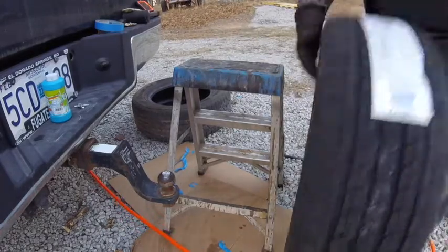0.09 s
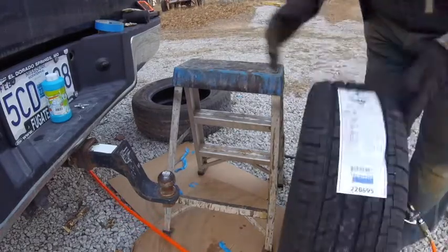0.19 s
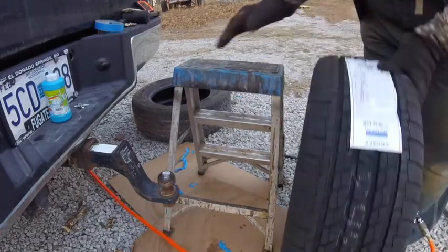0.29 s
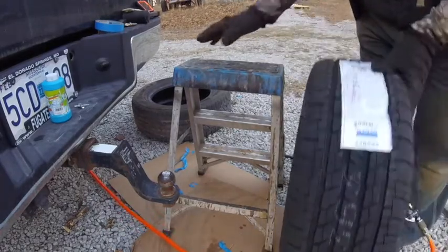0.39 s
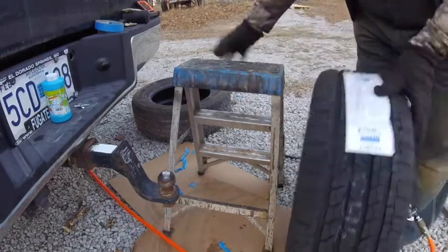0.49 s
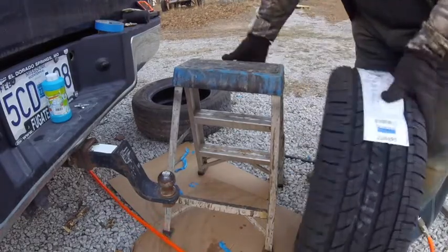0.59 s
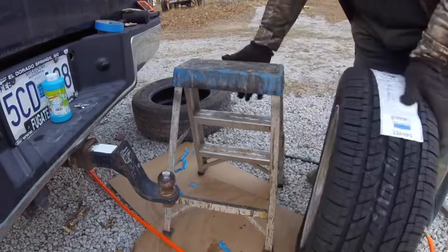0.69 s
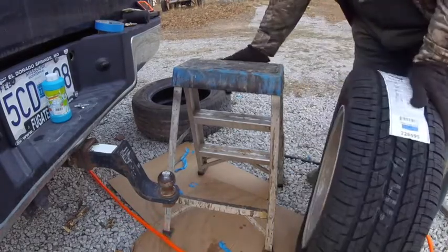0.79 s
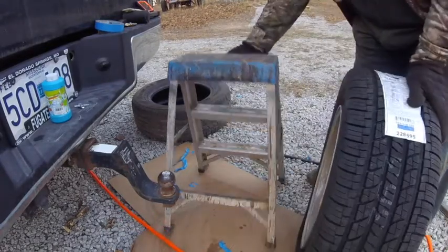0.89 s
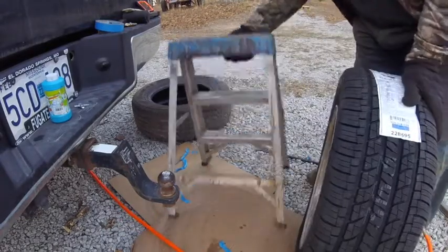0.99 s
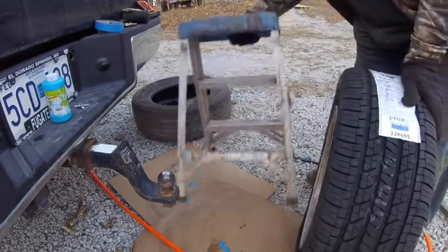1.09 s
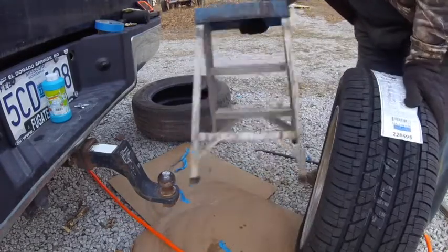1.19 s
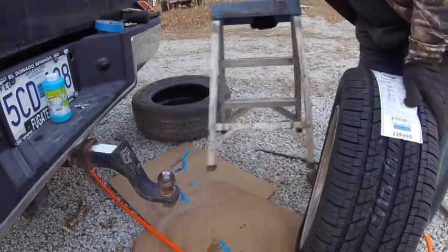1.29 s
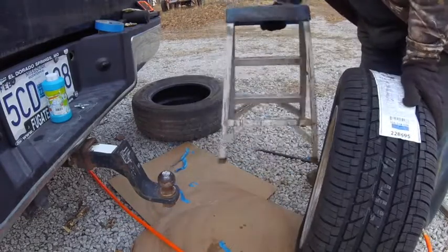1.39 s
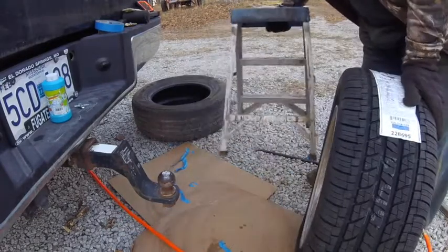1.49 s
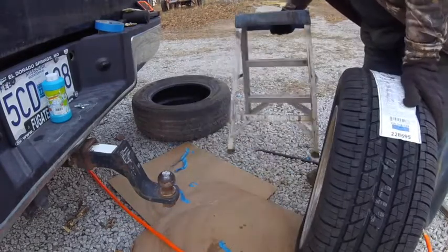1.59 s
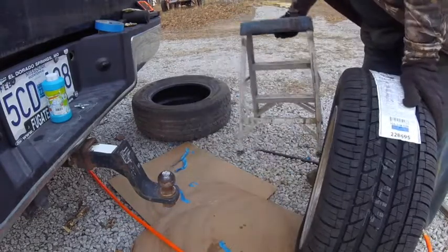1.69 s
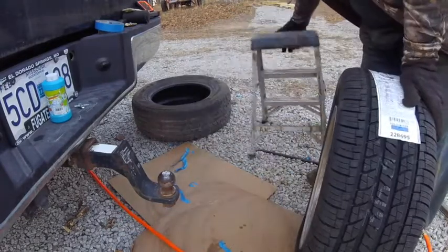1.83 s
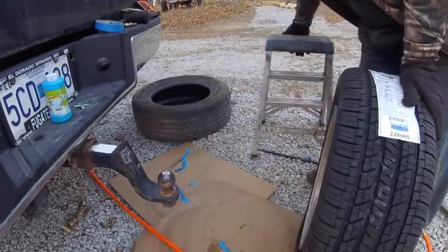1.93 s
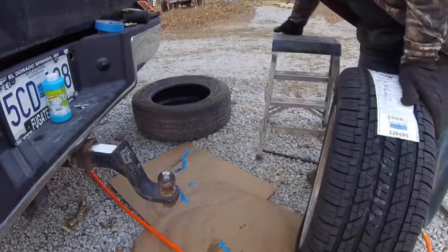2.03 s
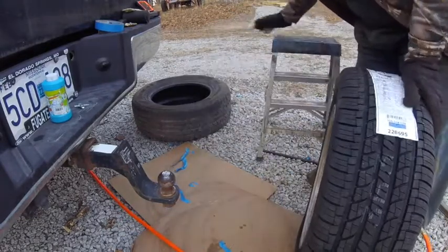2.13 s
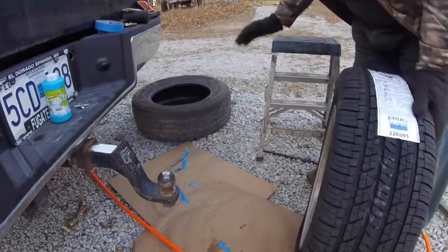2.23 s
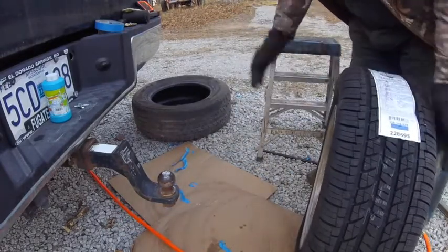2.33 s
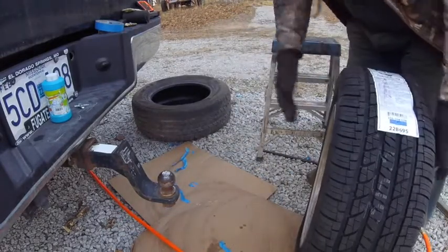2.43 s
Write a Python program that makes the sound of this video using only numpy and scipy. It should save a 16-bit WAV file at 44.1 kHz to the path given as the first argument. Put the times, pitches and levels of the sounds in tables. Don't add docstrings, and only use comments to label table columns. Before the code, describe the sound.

A rimmed tire drops on gravel with a hard slap and hollow boom, bounces again, then a light metal step stool is set down with ringing clanks and gritty scrapes; close microphone, quiet open yard.

```python
import sys
import numpy as np
from scipy import signal
from scipy.fft import rfft, irfft, next_fast_len
from scipy.io import wavfile
from scipy.ndimage import map_coordinates

SR = 44100
rng = np.random.default_rng(int(sys.argv[2]) if len(sys.argv) > 2 else 0)


def bounce(signal):
    frames = np.transpose(np.atleast_2d(signal))
    limited = np.clip(frames, -1, 1)
    pcm = np.round(limited * 32767).astype(np.int16)
    wavfile.write(sys.argv[1], SR, pcm)


def linear_from_db(decibels):
    return 10 ** (np.asarray(decibels, float) / 20)


N = 110250
T = np.arange(N) / SR
THUMP_RISE_S = 0.0036


def unit(x):
    return x / np.sqrt(np.mean(x ** 2) + 1e-20)


def along(points, hz):
    f, level_db = np.transpose(points)
    return linear_from_db(np.interp(np.log(hz + 1), np.log(f + 1), level_db))


def filtered(x, response):
    m = next_fast_len(N + 8192)
    return irfft(rfft(x, m) * response(np.fft.rfftfreq(m, 1 / SR)), m)[:N]


def colored(x, points):
    return unit(filtered(x, lambda f: along(points, f)))


def wobble(rate):
    knots = rng.standard_normal(int(N * rate / SR) + 4)
    return map_coordinates(knots, [T * rate])


def grains():
    clicks_per_s, spread_db = 5000, 3.5
    hit = rng.random(N) < clicks_per_s / SR
    size = linear_from_db(spread_db * rng.standard_normal(N))
    return unit(rng.standard_normal(N) * (0.51 + hit * size))


def burst(s, hold, db, release):
    rise_s = 0.002
    fall_db = 30 * np.clip(T - s - hold, 0, 1) / release
    return linear_from_db(db - fall_db) * np.clip((T - s) / rise_s, 0, 1)


def decay(s, db, t60):
    return linear_from_db(db - 60 * np.clip(T - s, 0, 1) / t60) * (T >= s)


def ring(s, db, modes, rise, scatter=1):
    t = np.clip(T - s, 0, 1)
    total = np.zeros(N)
    for hz, level, t60 in modes:
        mode_db = db + level + scatter * rng.normal(0, 1.5)
        phase = scatter * rng.normal(0, 0.35)
        total += linear_from_db(mode_db - 60 * t / t60) * np.sin(2 * np.pi * hz * t + phase)
    return -(1 - np.exp(-t / rise)) * total


# start_s, level_db
EDGE_BLOWS = [
    (.2048, -21),
    (.2090, -27),
]
# pitch_hz, level_db, t60_s
RIM = [(421.6, 3.5, 0.088), (472, 2.5, .05), (588, -9, 0.03), (790, -8.5, 0.034), (936, 9, 0.016),
       (1260, -10, 0.04), (1670, -9, 0.013), (1755, 4, 0.017), (1930, -10, 0.028), (2495, -5.5, 0.037),
       (2580, -15.5, 0.025)]
# pitch_hz, level_db, t60_s
SIDEWALL = [(103.7, -3.5, 0.2), (134, -0.5, 0.21), (178, 7, 0.046), (216, -4, 0.051)]


def first_landing():
    rim = sum(ring(s, db, RIM, 0.00053, scatter=0) for s, db in EDGE_BLOWS)
    squash = ring(0.2079, -21.5, SIDEWALL, 0.0021, scatter=0)
    return rim + squash


# start_s, thump_db, air_db, slap_db
LANDINGS = [(0.192, -39, -44.5, -53), (0.22, -36, -37, -20.5), (0.235, -26, -74, -52),
            (0.281, -50, -60, -30), (0.298, -24, -49.5, -33), (0.454, -29.5, -37, -33),
            (0.461, -38, -34.5, -30.5), (.483, -29.5, -36, -34.5), (0.492, -25.5, -59, -38.5),
            (0.562, -37.5, -74, -46.5), (0.611, -42, -48.5, -46), (.64, -40.5, -51.5, -46.5),
            (0.676, -47.5, -80, -75), (0.903, -40.5, -50, -47.5), (0.948, -37.5, -52, -79),
            (0.991, -47, -61.5, -79)]
# pitch_hz, level_db, t60_s
CARCASS = [(56.5, 0.5, 0.19), (98.2, 4, 0.08), (117.8, 2, 0.18), (140.5, 3, 0.077), (159, -8, 0.017)]
# pitch_hz, level_db, t60_s
CAVITY = [(216.8, 1, 0.26), (244, -6, 0.35)]
# pitch_hz, level_db, t60_s
TREAD = [(167, 3, 0.077), (415.5, -0.5, 0.075), (484, -2, 0.052), (793, -8, 0.054), (940, -2, 0.022),
         (1206, -16, 0.028), (1774, 2, 0.0094), (1910, -15, 0.027), (2450, -11.5, 0.029),
         (2637, -17, 0.043)]


def tire():
    out = first_landing()
    for s, thump_db, air_db, slap_db in LANDINGS:
        out += ring(s, thump_db - 7.5, CARCASS, THUMP_RISE_S)
        out += ring(s, air_db, CAVITY, THUMP_RISE_S)
        out += ring(s, slap_db - 6.0, TREAD, 0.00063)
    return out


# start_s, hold_s, level_db, release_s
CRUNCH = [(0.0, 0.013, -64.5, 0.076), (0.081, 0.055, -65, 0.05), (0.207, 0.015, -42, 0.02),
          (0.223, 0.014, -36.5, 0.011), (.279, 0.0024, -48, 0.015), (0.241, 0.054, -52, 0.078),
          (0.45, 0.0069, -49.5, 0.087), (0.467, 0.012, -57, 0.03), (0.512, 0.055, -62, 0.064),
          (0.599, 0.035, -63, 0.2), (0.854, 0.0061, -55, 0.055), (0.878, 0.011, -54.5, 0.09),
          (0.9106, 0.017, -45, 0.019), (0.938, 0.0082, -49, 0.028), (2.267, 0.068, -62.5, .04),
          (2.417, 0.036, -64, 0.046)]
# start_s, hold_s, level_db, release_s
IMPACT_SPRAY = (.2045, .005, -32, .008)
# freq_hz, level_db (per Hz)
STONES = [(180, -7), (300, -43), (382, -8), (826, -12.5), (1030, -14), (4190, -25.5), (5080, -16),
          (9220, -29), (14000, -82.5)]


def gravel():
    load = sum(burst(*row) for row in CRUNCH + [IMPACT_SPRAY])
    return load * colored(grains(), STONES)


# start_s, knock_db, thud_db (ground)
KNOCKS = [(1.402, -65, -41), (1.412, -26.5, -60), (1.846, -30, -64), (1.857, -25, -72), (1.864, -26, -72),
          (1.872, -24, -67), (1.876, -15.5, -63), (1.968, -19, -43), (1.973, -45, -73), (1.995, -34, -75),
          (2.004, -37.5, -50), (2.055, -44, -68), (2.068, -38.5, -54), (2.093, -40, -62),
          (2.099, -27.5, -49.5), (2.183, -58, -49.5)]


def foot_knocks():
    return sum(decay(s, db, 0.0062) for s, db, _ in KNOCKS) * rng.standard_normal(N)


# start_s, hold_s, level_db, release_s, bright_db
GRINDS = [(1.404, 0.0036, -43, 0.065, 1.5), (1.413, 0.026, -67, 0.026, -20),
          (1.8447, 0.011, -34.5, 0.0083, 11.5), (1.854, 0.014, -31.5, 0.053, 11.5),
          (1.87, 0.01, -28.5, 0.028, 6.5), (1.897, 0.078, -48, 0.064, 4.5), (1.958, 0.019, -45.5, 0.048, 6),
          (1.965, 0.0078, -32, 0.025, 1.5), (1.991, 0.023, -48.5, 0.11, 6.5),
          (2.001, 0.0019, -36, 0.015, -15), (2.047, 0.026, -49, 0.027, -12), (2.09, 0.018, -44, 0.065, 3.5),
          (2.145, 0.019, -53.5, 0.17, 2.5), (2.174, 0.017, -51, 0.015, -2)]
# pitch_hz, width_hz, level_db
BUMPED = [(150, 85, -7), (386, 28, 3), (755, 240, -8), (1090, 130, 0), (1400, 84, 0.5), (1820, 110, -5),
          (2190, 59, 0), (2680, 170, -10.5), (3400, 160, -13.5)]
# pitch_hz, width_hz, level_db
SET_DOWN = [(170, 150, -13.5), (412.5, 17.2, 7), (720, 63, -5.5), (894, 26, 2), (1150, 50, 2.5),
            (1270, 54, 4.5), (1373, 120, 2.5), (1780, 160, -8.5), (2210, 130, -1.5), (2830, 190, -4),
            (3180, 100, -17)]
# pitch_hz, width_hz, level_db
ROCKED = [(169, 150, -15.5), (404, 50, 2.5), (662, 110, -1.5), (923, 50, 3.5), (1131, 53, 4.5),
          (1310, 150, 2), (1614, 120, 0), (1856, 140, 0), (2270, 190, -1.5), (3320, 230, -8.5)]
# pitch_hz, width_hz, level_db
SETTLING = [(169, 88, -6.5), (402, 59, 1.5), (765, 110, -0.5), (1125, 42, 6), (1430, 300, -4),
            (1920, 92, 0), (2120, 210, -5.5), (2830, 250, -9.5), (3650, 110, -7.5)]


def body(modes):
    def response(f):
        total = linear_from_db(-41) * 1j * f / (300 + 1j * f)
        for k, (hz, width, db) in enumerate(modes):
            peak = 1j * f * width / (hz * hz - f * f + 1j * f * width)
            total = total + (-1) ** k * linear_from_db(db) * peak
        return total / (1 + 1j * f / 4100) ** 2
    return response


def stool_frame(knocks):
    rub = grains()
    shake = rub * sum(burst(*row[:4]) for row in GRINDS) + knocks
    stances = [(0, 1.6, BUMPED), (1.6, 1.94, SET_DOWN), (1.94, 2.035, ROCKED), (2.035, 2.5, SETTLING)]
    frame = np.zeros(N)
    for start_s, end_s, modes in stances:
        frame += filtered(shake * (T >= start_s) * (T < end_s), body(modes))
    return frame / np.std(filtered(rub, body(SET_DOWN)))


# freq_hz, level_db (per Hz)
GRIT = [(1000, -14.5), (3000, -2.5), (4200, -5.5), (5400, 2), (6500, -3.5), (8500, -13.5), (11000, -17.5),
        (14500, -62)]


def grit(knocks):
    spray = 0.09 * np.abs(knocks)
    for s, hold, db, release, bright_db in GRINDS:
        spray = spray + burst(s, hold, db + bright_db - 7, 0.52 * release)
    return spray * colored(grains(), GRIT)


# start_s, hold_s, level_db, release_s
FIZZ = [
    (.2045, .004, -60, .01),
    (1.845, .017, -50, .012),
    (1.874, .004, -65, .008),
    (1.974, .004, -66, .01),
    (2.092, .01, -74, .02),
]
# freq_hz, level_db (per Hz)
DUST = [(6000, -46), (8500, 6), (12000, -24), (14500, 1)]


def dust():
    return colored(grains(), DUST) * sum(burst(*row) for row in FIZZ)


# pitch_hz, level_db, t60_s
GROUND = [(72, -6, 0.15), (124, 7, 0.058), (177, -3, 0.16)]


def ground_thuds():
    return sum(ring(s, thud_db, GROUND, THUMP_RISE_S) for s, _, thud_db in KNOCKS)


def stool():
    knocks = foot_knocks()
    return stool_frame(knocks) + grit(knocks) + dust() + ground_thuds()


# start_s, peak_db, center_hz, width (over center)
TICKS = [(0.28, -18, 1050, 0.92), (0.388, -40, 1170, 1.3), (0.457, -23.5, 1820, 1.1), (.56, -55, 1100, .6),
         (.606, -40, 1490, 0.9), (.63, -46, 603, 1.6), (0.66, -27, 5670, 0.16), (.768, -26, 2080, 1.36),
         (.769, -27.5, 4960, 0.47), (0.782, -34, 400, 1.4), (0.8662, -31, 1850, 3.7),
         (0.8812, -26.5, 3400, 17), (0.914, -29, 6000, 0.7), (.919, -23, 6000, 1.4),
         (0.9234, -18, 5640, 0.35), (0.9256, -13.5, 5940, 0.45), (.946, -25, 5200, 0.31),
         (1.9690, -6, 2160, 0.53), (1.9715, -4.5, 1420, 0.29), (1.879, -15, 2210, .15),
         (2.183, -19.5, 2830, 0.071), (2.122, -43, 406, 0.31), (2.093, -16.5, 5930, 0.36),
         (2.147, -29.5, 6100, 0.59), (2.447, -38, 4040, 1.2)]


def ticks():
    out = np.zeros(N)
    for s, db, hz, width in TICKS:
        crack = 0.5 * rng.standard_normal(N) * decay(s, db, 0.011)
        crack[round(s * SR)] = 3 * linear_from_db(db)

        def band(f):
            peak = 1j * f * hz * width / (hz * hz - f * f + 1j * f * hz * width)
            return peak ** 2 / (1 + 1j * f / 8400) ** 3

        out += filtered(crack, band)
    return out


# start_s, level_db
ROAD = [(0.0, -80), (0.31, -47.5), (2.5, -86)]
# freq_hz, level_db (per Hz)
DEEP = [(15, 5), (28, -3), (45, 5.5), (70, -2.5), (100, -63)]
# freq_hz, level_db (per Hz)
RUMBLE = [(12, -38), (20, -0.5), (40, -8.5), (59, -15), (70, -4.5), (91, 0), (145, -23.5), (189, -18.5),
          (400, -32.5), (520, -74), (880, -120)]
# start_s, level_db
AIR = [(0.0, -79.5), (2.28, -80), (2.5, -77.5)]
# freq_hz, level_db (per Hz)
HISS = [(100, -7.5), (300, -4.5), (1000, -10.5), (3300, -18), (4300, -25), (5800, -21.5), (6550, -7.5),
        (7200, -14.5), (14000, -20)]


def yard():
    swell_db = 1.5
    deep_db = np.interp(T, *np.transpose(ROAD)) + swell_db * wobble(5)
    rumble_db = -58 + swell_db * wobble(2.02)
    air_db = np.interp(T, *np.transpose(AIR))
    hiss_db = -65.5 + 0.56 * (air_db - air_db.mean())
    out = np.zeros(N)
    for level_db, color in [(deep_db, DEEP), (rumble_db, RUMBLE), (hiss_db, HISS)]:
        out += linear_from_db(level_db) * colored(rng.standard_normal(N), color)
    return out


def reflections(near):
    t60_s, level_db = 0.15, -17
    tail = rng.standard_normal(SR // 2) * linear_from_db(-60 * T[:SR // 2] / t60_s)
    wet = signal.fftconvolve(np.pad(near, (300, 0)), tail / np.linalg.norm(tail))[:N]
    return linear_from_db(level_db) * filtered(wet, lambda f: 1 / (1 + 1j * f / 2500))


def scene():
    near = tire() + gravel() + stool() + ticks()
    return (near + reflections(near) + yard())[None]


def roll_off(x):
    return signal.sosfilt(signal.butter(12, 14730, fs=SR, output="sos"), x)


# freq_hz, level_db
MIC = [(7000, 0), (10000, -5.5), (13000, -6.5), (14300, -23), (14700, -56)]


def record(dry):
    mix = filtered(dry[0], lambda f: along(MIC, f))[None]
    return roll_off(mix)


dry = scene()
out = record(dry)
bounce(out)
```